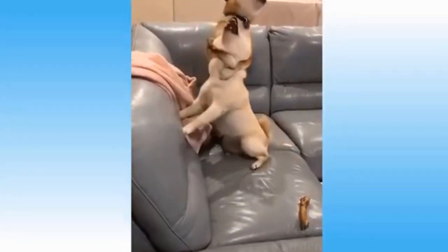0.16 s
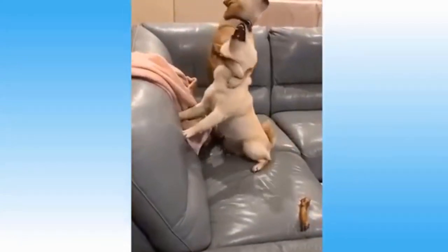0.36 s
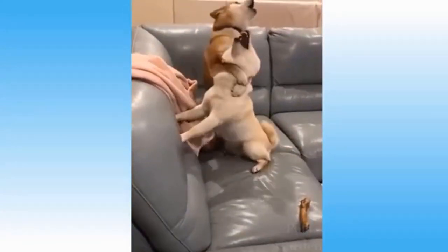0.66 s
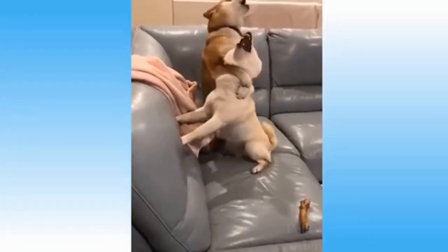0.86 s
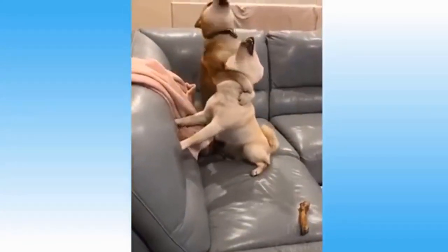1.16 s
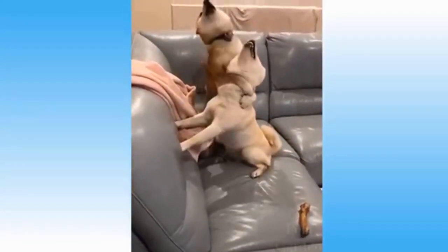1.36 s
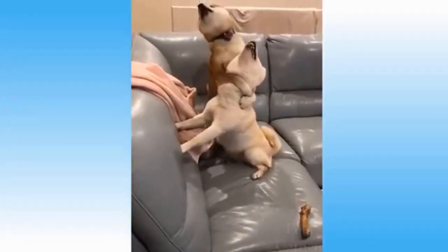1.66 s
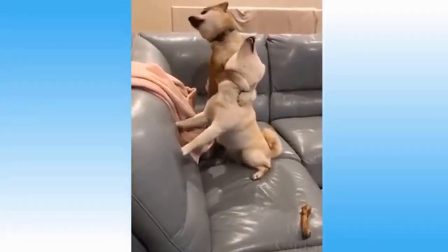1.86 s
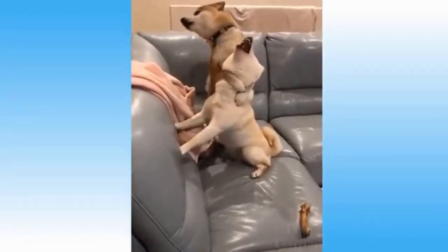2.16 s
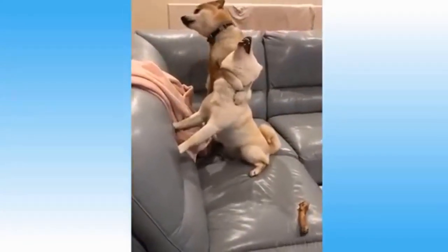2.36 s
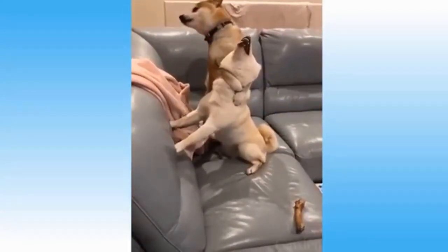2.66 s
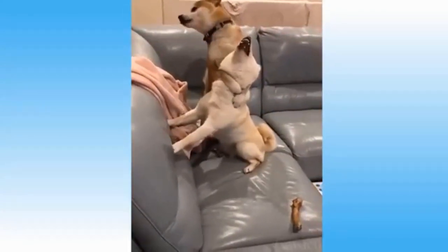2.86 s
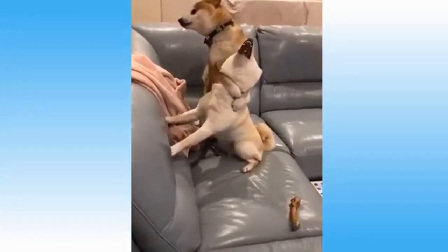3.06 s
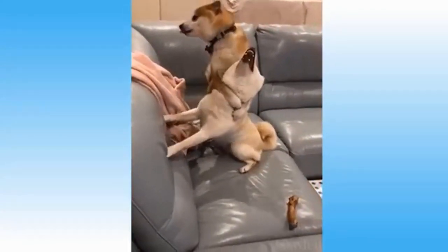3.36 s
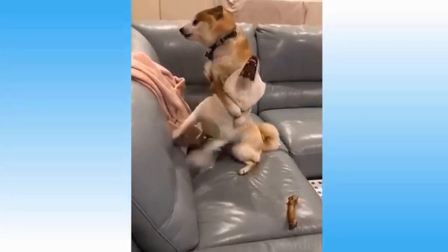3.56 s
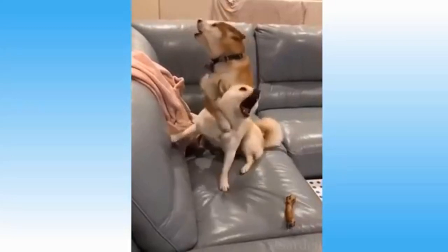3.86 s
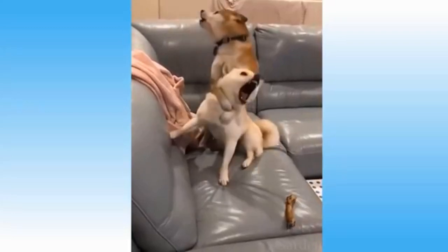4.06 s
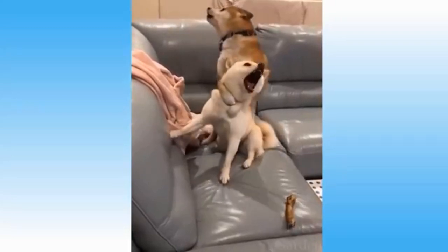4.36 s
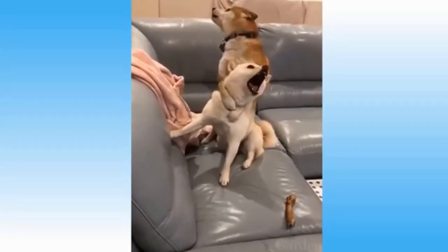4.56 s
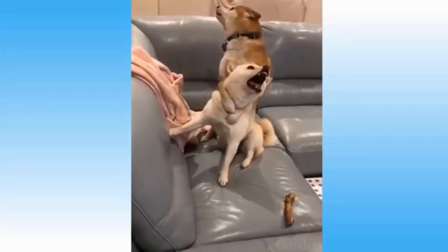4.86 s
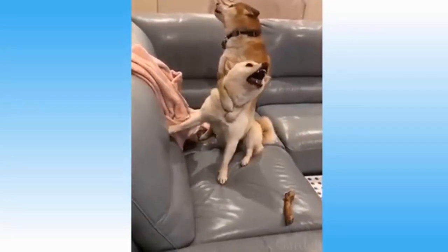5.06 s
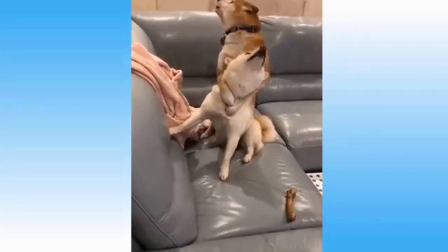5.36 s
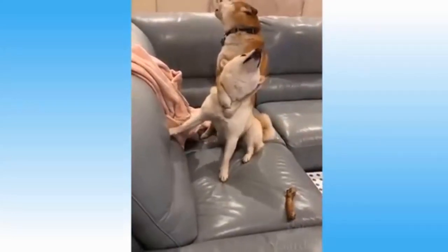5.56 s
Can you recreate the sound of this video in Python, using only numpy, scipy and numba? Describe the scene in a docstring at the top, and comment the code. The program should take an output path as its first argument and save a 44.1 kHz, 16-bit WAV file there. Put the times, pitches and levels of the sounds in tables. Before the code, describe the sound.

Two small dogs howl in an echoing living room. One gives two hoarse, high yells, and the other answers with a run of lower, rattling, growled cries. The first returns with a string of short, arching howls, soft whines filling the gaps. It then turns toward the microphone, squeaks and yells more harshly with a thin wheeze, while the lower dog joins in now and then.

```python
"""Over the faint ring of an earlier howl, a small dog yells in runs of hoarse, arching cries.
Soft low whines fill the gaps, and a second small dog answers lower, with a rattling, growled howl.
Each howl is a buzz of the vocal folds mixed with puffs of air and shaped by the throat and jaws.
Later the high dog turns to the microphone, squeaks and wheezes. The living room echoes around
their sofa, and a limiter (a fast automatic volume control) holds down the loudest peaks."""
import sys
import numpy as np
from scipy import signal
from scipy.fft import rfft, irfft
from scipy.io import wavfile
from scipy.ndimage import uniform_filter1d, minimum_filter1d
from numba import njit

SR = 44100
rng = np.random.default_rng(int(sys.argv[2]) if len(sys.argv) > 2 else 0)


def master(y):
    """Save y as 16-bit WAV."""
    cut = np.clip(np.atleast_2d(y).T, -1, 1)
    pcm = np.round(cut * 32767)  # scale
    wavfile.write(sys.argv[1], SR, pcm.astype(np.int16))


N = 251811
TIME = np.arange(N) / SR

# where the low dog's throat rings: (frequency [Hz], width [Hz], level [dB])
LOW_DOG_THROAT = [(251, 61, -18), (546, 53, -46), (853, 367, 13.5), (1293, 232, 5.5), (2064, 260, -1),
                  (3170, 568, -13.5), (7420, 3500, -29), (10170, 990, -49)]
# how long the room rings: (frequency [Hz], time to fade by 60 dB [s])
ROOM_RING_TIMES = [(150, 1), (500, 0.87), (1000, 0.86), (2000, 0.99), (4000, 0.87), (8000, 0.52),
                   (13000, 0.73)]


def from_db(db):
    """Turn decibels into a number to multiply by."""
    return 10 ** (np.asarray(db) / 20)


def unit_level(x):
    """Scale a signal so that its average level (rms) is 1."""
    return x / np.sqrt(np.mean(x ** 2) + 1e-20)


def at_hz(points, hz):
    """Read between the rows of a table, with every octave equally wide."""
    row_hz, value = np.transpose(points)
    return np.interp(np.log(hz + 1e-9), np.log(row_hz), value)


def butter(x, hz, kind, order=2):
    """A smooth filter that keeps the lows, the highs or a band."""
    return signal.sosfilt(signal.butter(order, hz, kind, fs=SR, output="sos"), x)


def wobble(hz):
    """Random motion up to about the given rate, with a typical size of 1."""
    return unit_level(butter(rng.standard_normal(N + SR), hz, "low")[SR:])


def steady(x):
    """Hold the level at 1 from moment to moment."""
    return x / np.sqrt(np.abs(uniform_filter1d(x ** 2, size=900)) + 1e-12)


@njit
def resonate(x, turn, r):
    """Ring at a moving frequency (turn, in radians per sample); r nearer 1 rings longer."""
    y = np.zeros(len(x))
    for i in range(2, len(x)):
        y[i] = (1 - r * r) / 2 * (x[i] - x[i - 2]) + r * (2 * np.cos(turn[i]) * y[i - 1] - r * y[i - 2])
    return y


def throat(x, resonances, stretch):
    """The throat rings at several frequencies, which stretch moves up or down together."""
    out = 0
    for hz, width, db in resonances:
        r, turn = np.exp(-np.pi * width / SR), 2 * np.pi * hz * stretch / SR
        out = out + from_db(db) * resonate(resonate(x, turn, r), turn, r)   # twice, for deep valleys
    return out


def background():
    """Quiet room noise, and the dying ring of an earlier howl."""
    # tone of the room noise: (frequency [Hz], relative level [dB])
    noise_shape = [(30, -21), (100, -14.5), (220, 2), (400, -9), (1000, 3), (4000, -13), (13000, -35)]
    hz = np.arange(N // 2 + 1) * SR / N
    noise = irfft(rfft(rng.standard_normal(N)) * from_db(at_hz(noise_shape, hz)), N)
    ring = unit_level(throat(rng.standard_normal(N), LOW_DOG_THROAT, np.ones(N)))
    ring_db = -33.5 - 60 * TIME / at_hz(ROOM_RING_TIMES, 1000)
    return from_db(-45.5) * unit_level(noise) + from_db(ring_db) * ring


def jaws(table):
    """How open the jaws are, 0-1: they open quickly and close slowly in each cry."""
    along = [np.clip((TIME - start) / length, 0, 1) for start, _, length, *_ in table]
    return np.clip(sum(np.sin(np.pi * a ** 0.74) for a in along), 0, 1)


def progress(age, rise, length):
    """How far a cry is through its rise and through its fall, each 0-1."""
    return np.clip(age / rise, 0, 1), np.clip((age - rise) / (length - rise), 0, 1)


def voice_box(table, sag, waver, waver_hz):
    """Pitch and roughness: each cry scoops up, holds, breaks upward and sags as it fades."""
    scoop_s, hold_s, break_s, break_share = .053, .028, .018, .21
    frayed, fray_after_s, fray_s = .68, .125, .1245   # every cry drifts toward the same roughness
    rows = np.array(table)
    latest_cry = np.maximum(np.searchsorted(rows[:, 0], TIME, side="right") - 1, 0)
    start, rise, length, _, _, _, first_hz, top_hz, base_rough = rows[latest_cry].T
    age = TIME - start
    risen, fallen = progress(age, rise, length)
    scooped = np.clip(age / scoop_s, 0, 1)
    broken = np.clip((age - scoop_s - hold_s) / break_s, 0, 1)
    climb = (1 - break_share) * scooped + break_share * broken
    pitch = (first_hz + (top_hz - first_hz) * climb) * (1 - sag * fallen ** 2)
    worn = np.clip((age - fray_after_s) / fray_s, 0, 1)
    rough = base_rough * (1 + .3883 * (1 - risen))   # rougher before the voice catches
    rough += (frayed - base_rough) * worn
    return pitch * (1 + waver * rough * wobble(waver_hz)), rough


def vocal_folds(pitch, rough, opening, jitter, jitter_hz, doubling, turbulence, hiss, rattle_hz, rattle):
    """One pulse per cycle; roughness shakes the timing, makes pulses alternate and adds puffs of air."""
    rough = np.clip(rough, .02, 1)
    shaky_hz = pitch * (1 + jitter * rough * np.sqrt(rough) * wobble(jitter_hz))
    phase = 2 * np.pi * np.cumsum(shaky_hz) / SR
    # the folds zip shut along their length, which smears each pulse
    pulses = unit_level(sum(np.cos(k * phase - .15 * k * k) for k in np.arange(1, 27)))
    uneven = 1 + doubling * rough * np.tanh(wobble(104)) * np.cos(phase / 2)
    puffs = unit_level(rng.standard_normal(N) * (1 + 0.31 * np.cos(phase)))
    air = turbulence * rough ** 2 * puffs
    air += hiss * opening ** 2 * butter(puffs, 9200, "high")   # open jaws let the hiss out
    # loose tissue chops the voice into uneven bursts
    flaps = np.cumsum(rattle_hz * np.exp(.33 * wobble(56.1))) / SR
    bursts = np.exp(rough * (rattle * np.cos(2 * np.pi * flaps) + 0.32 * wobble(37)))
    flow = pulses * uneven + air
    lows = butter(flow, 1500, "low", order=1)   # the chopping is strongest in the low part
    return lows * bursts + (flow - lows) * np.sqrt(bursts)


def cries(voice, table, edge_s, release_s, fade_db, fade_bend, early_rasp_db, late_rasp_db, shrill_db):
    """Each cry swells, then fades ever faster; its rasp (the treble) shifts in the rise and the fall."""
    split_hz = 2300
    body = steady(butter(voice, split_hz, "low", order=4))
    rasp = steady(butter(voice, split_hz, "high", order=4))
    out = np.zeros(N)
    for start, rise, length, level_db, swell_db, rasp_db, *_ in table:
        age = TIME - start
        risen, fallen = progress(age, rise, length)
        gate = np.clip(age / edge_s, 0, 1) * np.exp(-np.maximum(age - length, 0) / release_s)
        effort = from_db(level_db - swell_db * (1 - risen) - fade_db * fallen ** fade_bend)
        bite = from_db(rasp_db + shrill_db + early_rasp_db * (1.5 - risen) + late_rasp_db * fallen ** 2)
        out += gate * effort * (body + bite * rasp)
    return out


def high_dog(facing):
    """Hoarse yells, with the muzzle raised (facing 0) or jaws wide toward the microphone (facing 1)."""
    # the cries: (start [s], rise [s], length [s], relative level [dB], swell [dB], rasp [dB],
    # first pitch [Hz], top pitch [Hz], roughness [0-1])
    yells = [ (.112, 0.059, 0.23, -8, 14, -18.5, 420, 558.9, .42),
             (0.349, 0.06, 0.21, -16.5, 9, -11, 525.4, 624.6, 0.88),
             (1.984, 0.054, 0.25, -9.5, 14, -13.5, 321.7, 535, 0.4),
             (2.329, 0.0552, .25, -9.5, 5, -16.5, 489.8, 552.2, .55),
             (2.632, 0.067, .25, -9, 7.5, -18.5, 469.8, 540.7, 0.41),
             (2.912, 0.0612, .245, -9, 10, -17, 489.8, 537.8, 0.41),
             (3.212, .06, 0.23, -8.5, 7, -16.5, 470.1, 541.4, .42),
             (3.778, 0.034, 0.22, -7.5, 17.5, -10, 329.3, 551.5, 0.14),
             (4.022, 0.092, .235, -9.5, 5.5, -9.5, 489.6, 540.8, .45),
             (4.249, 0.095, .2, -10.5, 5, -8.5, 479.9, 556.3, .8),
             (4.492, 0.09593, .21, -10.5, 4, -10.5, 438, 559, 0.78),
             (4.744, 0.073, 0.21, -10, 6, -12.5, 430.7, 559, 0.83),
             (5.476, 0.051, 0.23, -8, -1.5, -13, 408.6, 573.3, 0.17)]
    # where the throat rings in each pose: (frequency [Hz], width [Hz], level [dB])
    muzzle_up = [(511, 100, -8.5), (1120, 392, 10), (1743, 356, 9), (2764, 1440, 3.5), (3980, 327, -2),
                 (7600, 2070, -10.5), (8955, 470, -13.5), (13200, 630, -61)]
    jaws_wide = [(573, 57, -9.5), (1143, 425, 8.5), (1631, 254, 6.5), (2879.6, 530, 0.5), (3163, 165, -3.5),
                 (3909, 267, -4.5), (7460, 850, -18.5), (9260, 1320, -23.5), (12528, 1200, -37)]
    opening = jaws(yells)
    pitch, rough = voice_box(yells, sag=.05, waver=0.0061, waver_hz=24.95)
    buzz = vocal_folds(pitch, rough, opening, jitter=.155, jitter_hz=167.66, doubling=1.37,
                       turbulence=4.4, hiss=0.18, rattle_hz=124.6, rattle=0.032)
    stretch = 1 + 0.22 * (opening - .8)   # the throat rings higher as the jaws open
    voice = (1 - facing) * throat(buzz, muzzle_up, stretch) + facing * throat(buzz, jaws_wide, stretch)
    shrill_db = 6 * np.clip(1 - rough / .22, 0, 1)   # cleanly vibrating folds make the overtones pierce
    howl = cries(voice, yells, edge_s=0.021, release_s=0.019, fade_db=14.5, fade_bend=1.66,
                 early_rasp_db=-2.5, late_rasp_db=-3, shrill_db=shrill_db)
    return from_db(-1.64) * howl + squeaks() + wheeze(opening)


def room_echo(x):
    """A wash of reflections that builds up quickly and dies faster in the treble."""
    t, hz = TIME[:SR], np.arange(SR // 2 + 1)
    noise_spectrum = rfft(rng.standard_normal(SR))
    edges_hz = np.geomspace(60, 16000, 10)
    tail = 0
    for low, high in zip(edges_hz, edges_hz[1:]):
        band = irfft(noise_spectrum * ((hz >= low) & (hz < high)), SR)
        tail = tail + band * from_db(-60 * t / at_hz(ROOM_RING_TIMES, np.sqrt(low * high)))
    build_up = np.clip((t - .003) / .008, 0, 1)
    tail = tail * build_up * (1 + .8 * np.exp(-t / .05))   # early reflections are stronger
    return signal.fftconvolve(x, tail / np.sqrt(np.sum(tail ** 2)))[:N]


def whines():
    """Soft, wavering glides between the cries: a low tone and the octave above it."""
    # the whines: (start [s], end [s], first pitch [Hz], last pitch [Hz], level [dB])
    glides = [(0.342, 0.507, 265, 282, -40.5), (2.519, 2.634, 230, 257.2, -43.5),
              (2.815, 2.956, 245, 268.2, -50.5), (3.106, 3.219, 260, 220, -45),
              (3.405, 3.498, 270, 184.5, -62), (3.68, 3.811, 390, 400.3, -48),
              (4.438, 4.505, 265, 294.4, -47), (4.662, 4.761, 268, 247.8, -48.5),
              (4.943, 5.099, 260, 201.8, -51)]
    waver = 1 + 0.0746 * wobble(38.95)
    out = np.zeros(N)
    for start, end, first_hz, last_hz, db in glides:
        along = np.clip((TIME - start) / (end - start), 0, 1)
        phase = 2 * np.pi * np.cumsum((first_hz + (last_hz - first_hz) * along) * waver) / SR
        tone = np.sin(phase) + 1.02 * np.sin(2 * phase)
        out += from_db(db) * np.sqrt(4 * along * (1 - along)) * tone
    return out


def low_dog():
    """A darker, growled howl that rattles strongly as loose tissue flaps."""
    # the cries: (start [s], rise [s], length [s], relative level [dB], swell [dB], rasp [dB],
    # first pitch [Hz], top pitch [Hz], roughness [0-1])
    growls = [ (.55, 0.049, .18, -11.5, 10.2, -6.5, 245, 277.8, 0.855),
              (.72, 0.057, .19, -11, 13, -7.5, 255.5, 275.7, .7),
              (.92, 0.088, 0.15, -13.5, 6.3, -12.5, 280.1, 328, 0.61),
              (1.09, 0.097, 0.17, -14, 4.6, -10.5, 274.8, 307.9, .56),
              (1.29, 0.078, .23, -17.5, 6, -5.5, 274.9, 297.7, 0.599),
              (2.19, 0.072, 0.187, -10.5, 3.03, -9.5, 250.3, 276.3, 0.616),
              (3.91, 0.061, .41, -12, 5.4, -11, 257.5, 260.5, .36),
              (5.345, 0.041, 0.21, -13.5, 23.2, -9.5, 245.3, 269.6, 0.48),
              (5.652, 0.018, 0.082, -19.5, 3.7, -6, 252.5, 250.6, 0.41)]
    opening = jaws(growls)
    pitch, rough = voice_box(growls, sag=.02, waver=.035, waver_hz=18)
    buzz = vocal_folds(pitch, rough, opening, jitter=.13, jitter_hz=150, doubling=1.5,
                       turbulence=2.7, hiss=1.3, rattle_hz=85, rattle=.6)
    voice = throat(buzz, LOW_DOG_THROAT, stretch=1 + 0.138 * (opening - .7))
    howl = cries(voice, growls, edge_s=0.023, release_s=0.0097, fade_db=12, fade_bend=1.3,
                 early_rasp_db=4, late_rasp_db=4.5, shrill_db=-6.0)
    return from_db(-0.5) * howl


def whistle(hz, half_width_hz=300):
    """Air through a narrow gap: a ragged, noisy tone."""
    drift = .025 * wobble(18)
    phase = 2 * np.pi * np.cumsum(hz * (1 + drift)) / SR
    return wobble(half_width_hz) * np.cos(phase) + wobble(half_width_hz) * np.sin(phase)


def squeaks(half_length_s=.01):
    """Brief whistles in the high dog's throat, where the voice catches and where it cracks."""
    # the squeaks: (time [s], pitch [Hz], level [dB])
    catches = [(3.799, 5920, -54), (3.913, 6032, -26.5)]
    return sum(from_db(db) * np.exp(-((TIME - when) / half_length_s) ** 2) * whistle(hz)
               for when, hz, db in catches)


def wheeze(opening, start_s=3.93, end_s=5.0, closed_hz=6343):
    """A thin whistle through the high dog's third run of cries; its pitch arches with the jaws."""
    along = np.clip((TIME - start_s) / (end_s - start_s), 0, 1)
    swell = 2 * np.sqrt(along * (1 - along))
    flutter_db = 2.5 * wobble(15)
    return from_db(-43 + flutter_db) * swell * whistle(closed_hz * (1 + .13 * opening))


def scene():
    """Both dogs in the room; the high one turns to the microphone before its third run."""
    facing = np.clip((TIME - 3.6) / .1, 0, 1)
    high = high_dog(facing)
    low = low_dog() + whines()
    echo = room_echo(high * from_db(-2.5 * facing) + low)   # less echo once the dog has turned
    return (high + low + from_db(-2) * echo + background())[None]


def record(dry):
    """A faint rumble and slightly hollow low mids; a fast limiter holds the peaks; the top is cut."""
    ceiling, cutoff_hz = .94, 13200
    # a faint low rumble of distortion under the loudest cries
    rumble = from_db(-32.5) * butter(dry ** 2, [30, 220], "band")
    low_mids = signal.lfilter(*signal.iirpeak(395, 3.5, fs=SR), dry)
    hollow = dry + rumble - from_db(-14.5) * low_mids
    needed_gain = ceiling / np.maximum(np.abs(hollow), ceiling)
    smooth_gain = uniform_filter1d(minimum_filter1d(needed_gain, size=33), size=33)
    treble_cut = signal.ellip(10, .1, 80, cutoff_hz, fs=SR, output="sos")
    return signal.sosfilt(treble_cut, hollow * smooth_gain)


dry = scene()
out = record(dry)
master(out)
```